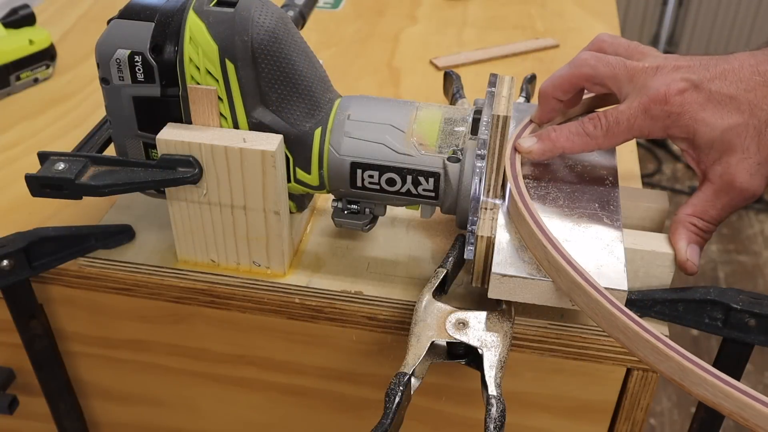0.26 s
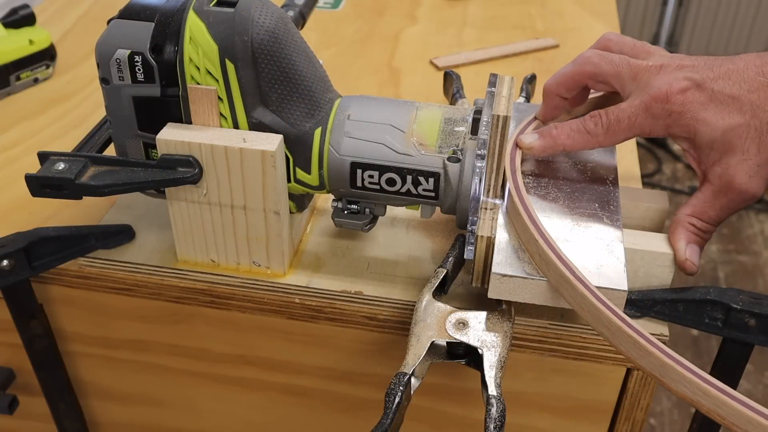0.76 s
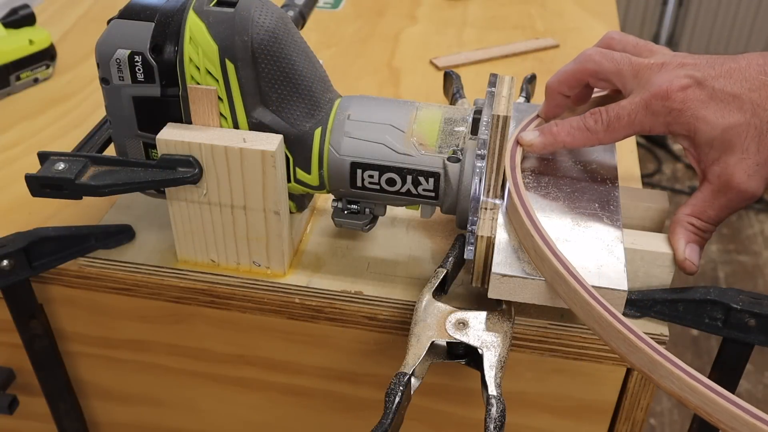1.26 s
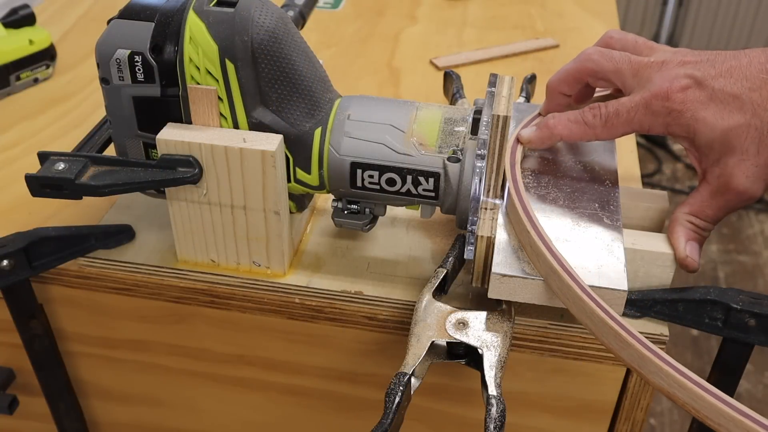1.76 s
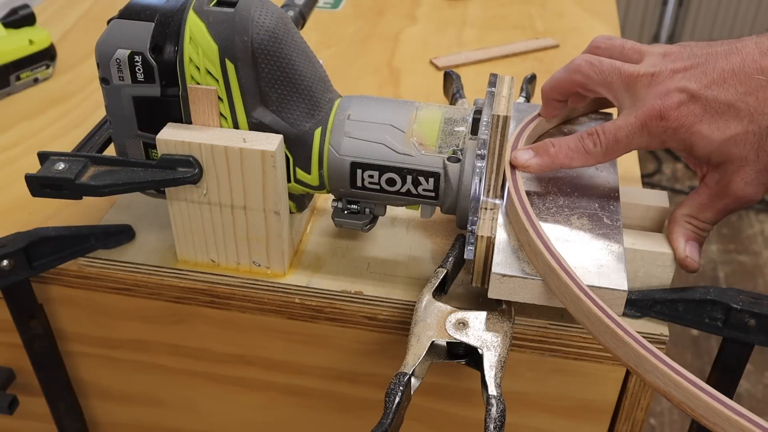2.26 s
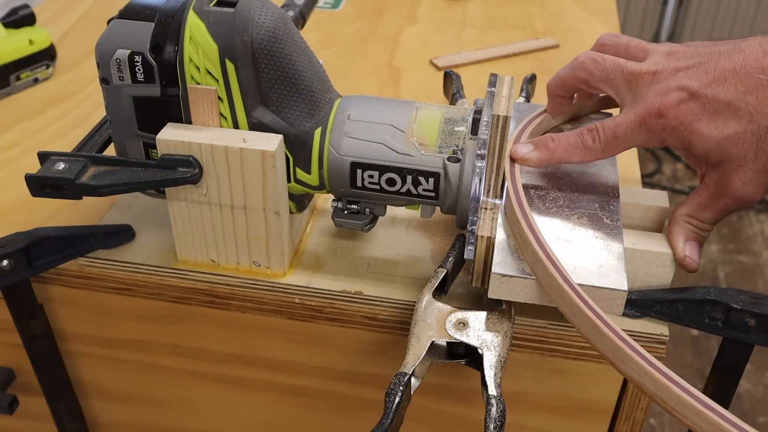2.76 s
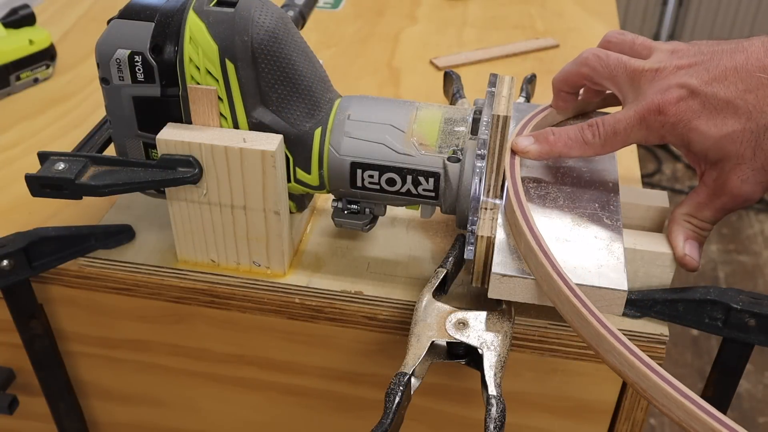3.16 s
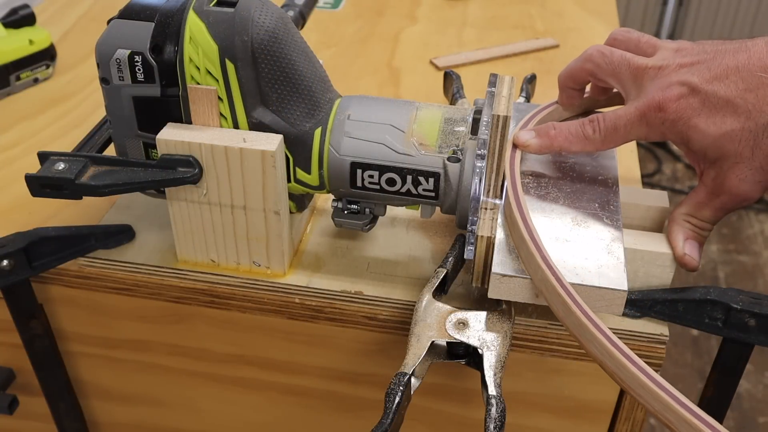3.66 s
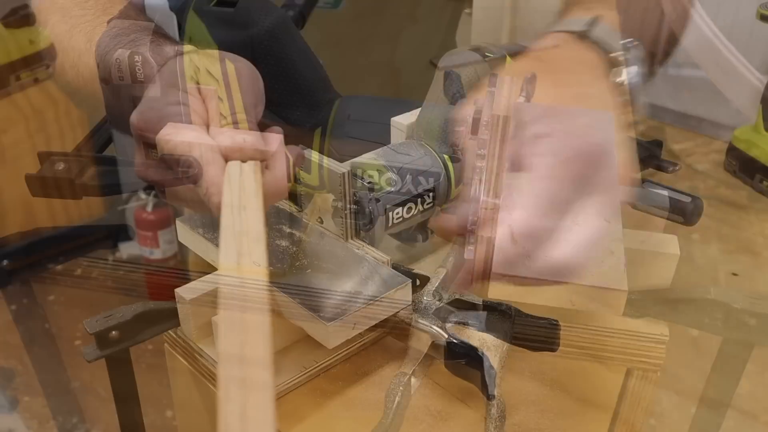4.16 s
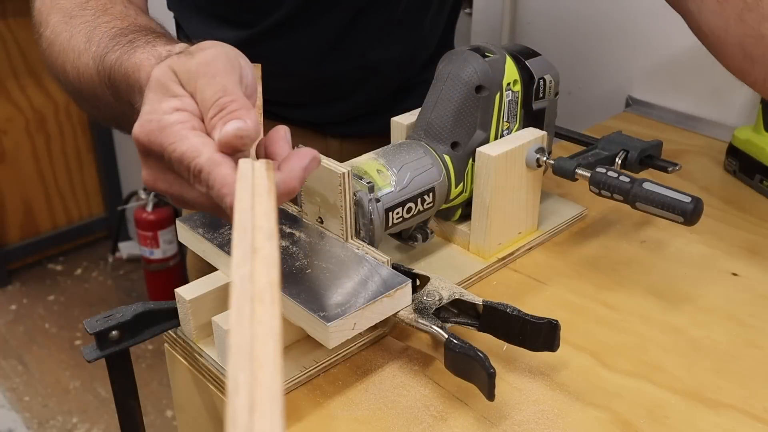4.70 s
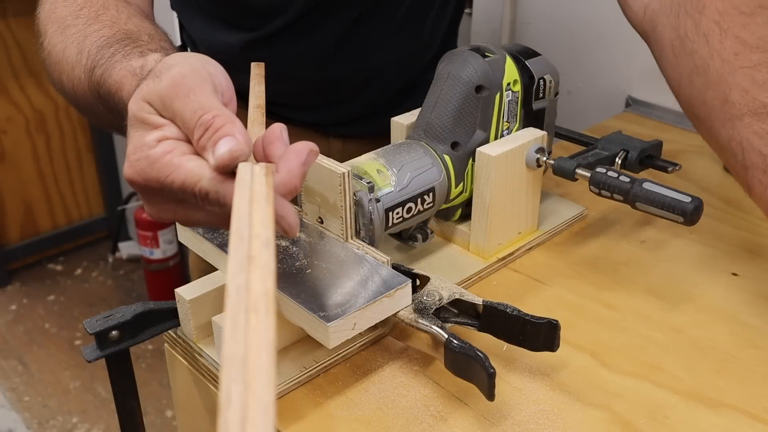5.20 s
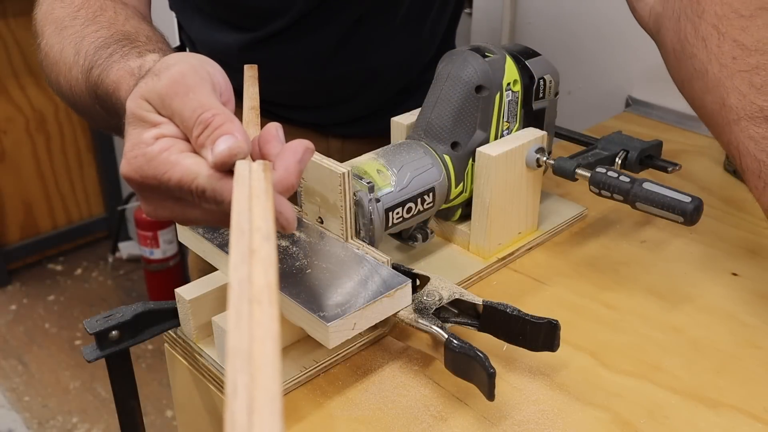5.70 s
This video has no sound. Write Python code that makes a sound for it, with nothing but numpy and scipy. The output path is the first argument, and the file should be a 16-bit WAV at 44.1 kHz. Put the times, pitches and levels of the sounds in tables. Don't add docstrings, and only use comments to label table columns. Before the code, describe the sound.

From 0 s a small trim router is already at full speed, heard close and dry. A strong, steady hum around 430 Hz dominates, with a high singing fan whine near 5 kHz, fine brushy overtones and a wide airy hiss. Hand pressure on the wooden strip makes the hum swell and ease slightly. Around 1.7-2.2 s the load lightens and pitch rises a hair; at about 2.3 s there is a short, rough grab and surge, then the motor settles lower. From 2.5 to 3.5 s the whine flutters with tiny judders, with another brief grab at 3.0 s. Near 3.9 s the strip flicks off, the pitch lifts, and the router fades out by 4.4 s. A much quieter workshop remains: soft ventilation and faint mains hum. A barely audible brush comes at 4.6 s, a small dry wood scuff at 5.45 s, then a lighter one at 5.6 s with a very faint, thin, high squeak until 5.87 s.

```python
import sys
import numpy as np
from scipy import signal
from scipy.fft import rfft, irfft, next_fast_len
from scipy.io import wavfile
from scipy.ndimage import uniform_filter1d

SR = 44100
rng = np.random.default_rng(int(sys.argv[2]) if len(sys.argv) > 2 else 0)


def generate_wav(signal):
    frames = np.transpose(np.atleast_2d(signal))
    scaled = np.clip(frames, -1, 1) * 32767
    pcm = np.round(scaled).astype(np.int16)
    wavfile.write(sys.argv[1], SR, pcm)


def undo_db(level):
    steps = np.asarray(level, float) / 20
    return 10 ** steps


N = 261947
TIME_S = np.arange(N) / SR
BLADES = 12


def level(x, db):
    return x * undo_db(db) / np.sqrt(np.mean(x ** 2))


def curves(table):
    s, *columns = np.transpose(table)
    return [np.interp(TIME_S, s, c) for c in columns]


def bump(s, half_s):
    return np.exp(-0.5 * ((TIME_S - s) / half_s) ** 2)


def walk(rate_hz):
    hold = int(SR / rate_hz)
    steps = np.repeat(rng.standard_normal(N // hold + 1), hold)
    return 1.154 * uniform_filter1d(uniform_filter1d(steps, hold), hold)[:N]


def band(hz, width_hz):
    b, a = signal.iirpeak(hz, hz / width_hz, fs=SR)
    once = signal.lfilter(b, a, rng.standard_normal(N))
    return level(signal.lfilter(b, a, once), 0)


def hiss(colour, swell_db, flicker_db, rate_hz, gate=1):
    size = next_fast_len(N)
    hz = np.fft.rfftfreq(size, 1 / SR) + 1e-3
    f, db = np.transpose(colour)
    tint = undo_db(np.interp(np.log(hz), np.log(f), db, right=-60))
    shaped = rfft(gate * rng.standard_normal(N), size) * tint
    third = 3 * np.log2(hz / 20)
    swell, out = swell_db * walk(rate_hz), 0
    for k in range(30):
        share = np.clip(1 - np.abs(third - k), 0, 1)
        out = out + irfft(shaped * share, size)[:N] * undo_db(swell + flicker_db * walk(rate_hz))
    return level(out, 0)


def order(turn, count, db, rough, rate_hz):
    wander = 1 + rough * (walk(rate_hz) + 1j * walk(rate_hz))
    spin = np.exp(1j * (count * turn + rng.uniform(0, 2 * np.pi)))
    return np.sqrt(2) * undo_db(db) * np.real(wander * spin) / np.sqrt(1 + 2 * rough ** 2)


def router():
    shaft_hz, turn = shaft()
    press, free, grabs = feed()
    surge_db = 1.5 * bump(2.3, half_s=0.22)
    thinning_db = -0.56 * TIME_S
    chips_db = thinning_db + 1.1 * grabs + free + surge_db
    vent_db = -44.5 + 0.078 * press + chips_db
    puff = 1 + 0.15 * np.cos(turn)
    out = shaft_hum(turn, press, free, grabs) + blade_tone(turn, press, free)
    out += bar_tones(turn, press, free) + whine_and_vents(turn, shaft_hz, vent_db, press, free, grabs, puff)
    out += cage_rattle(turn, press, free) + air_hiss(press, chips_db, puff)
    fade_start_s, fade_end_s = 3.902, 4.39
    return out * np.clip((fade_end_s - TIME_S) / (fade_end_s - fade_start_s), 0, 1) ** 1.24


# (time [s], speed [turns/s])
SHAFT_SPEED = [(.05, 429.2), (.29, 431.4), (.55, 430.3), (.8, 430.1), (1.01, 432.1), (1.25, 431.3),
               (1.52, 429.3), (1.64, 430.4), (1.8, 434.1), (2.09, 435.2), (2.21, 434.9), (2.36, 431.4),
               (2.55, 429.1), (2.86, 429.5), (3.04, 426.2), (3.17, 428.0), (3.82, 429.6), (4.07, 436.1)]


def shaft():
    shaft_hz, = curves(SHAFT_SPEED)
    return shaft_hz, 2 * np.pi * np.cumsum(shaft_hz + 0.261 * walk(12)) / SR


# (time [s], pressure over light contact [dB])
PRESSURE = [(0, 6), (.23, 2), (.6, 5.5), (.65, 3), (.72, 6), (1.0, 2), (1.08, 3.5), (1.56, 5), (1.71, 0.5),
            (2.2, .6), (2.26, 2), (2.42, 5.5), (2.82, 4.5), (3.0, 5.5), (3.77, 3.5), (3.93, 1.5)]
# (time [s], half length [s], strength [dB])
GRAIN_GRABS = [
    (2.265, 0.019, -0.5),
    (2.395, 0.013, -11),
    (3.025, 0.016, -7.5),
]


def feed():
    leaves_s, leave_takes_s = 3.965, 0.038
    free = np.clip((TIME_S - leaves_s) / leave_takes_s + 0.5, 0, 1)
    press = curves(PRESSURE)[0] * (1 - free)
    grabs = sum(undo_db(db) * bump(s, half_s) for s, half_s, db in GRAIN_GRABS)
    return press, free, grabs


# (order, light contact [dB], slope [dB per dB pressure], change when free [dB], wander [dB])
LOW_ORDERS = [(1, -27.5, 1, -2.5, 0.52), (2, -43, 0.83, -11, 1), (3, -45.5, 0.54, -4.5, 2),
              (4, -54.5, -0.7, 3, 2.5), (5, -58.5, 0.14, -3, 3), (6, -60, 1.1, 4, 0.5),
              (7, -45, -0.46, 0.5, 0.5)]
GRAB_ORDERS_DB = [-29, -42, -36, -35, -39, -41.5, -43]
FLICK_ORDERS_DB = [-41, -38, -64, -39, -52, -58, -40]
# (order, time [s], half length [s], level [dB])
STRIP_SINGS = [(3, 1.07, 0.62, -47), (3, 3.54, .18, -45), (4, 0.41, 0.021, -48), (3, 2.5, 0.47, -40.5),
               (4, 1.12, 0.068, -45), (4, 1.37, 0.025, -48), (4, 1.78, .1, -53), (4, 3.16, .08, -56),
               (4, 3.85, 0.036, -42.5), (5, 0.19, 0.18, -46.5), (5, 0.61, 0.11, -48.5),
               (5, 0.81, 0.046, -42.5), (5, 1.27, 0.28, -49.5), (5, 2.8, 0.02, -49), (5, 3.82, .05, -47),
               (6, 0.63, 0.058, -51), (6, 0.88, 0.043, -44.5), (6, 1.26, 0.16, -40.5),
               (6, 1.52, 0.038, -50), (6, 2.43, 0.028, -44), (6, 2.6, 0.063, -42), (6, 2.8, 0.077, -46.5),
               (6, 3.77, 0.05, -46), (7, .39, 0.047, -51), (7, 1.3, 0.29, -47.5), (7, 2.72, 0.19, -44),
               (7, 3.1, 0.033, -43.5), (7, 3.29, 0.032, -40.5), (7, 3.45, 0.034, -41), (7, 3.66, .05, -44)]


def shaft_hum(turn, press, free, grabs):
    out, flick = 0, bump(3.93, half_s=0.012)
    for row, grab_db, flick_db in zip(LOW_ORDERS, GRAB_ORDERS_DB, FLICK_ORDERS_DB):
        k, db, slope, free_db, wander_db = row
        size = undo_db(db + slope * press + free_db * free + wander_db * walk(14))
        size = size + undo_db(grab_db) * grabs + undo_db(flick_db) * flick
        for sung, s, half_s, sing_db in STRIP_SINGS:
            if sung == k:
                size = size + undo_db(sing_db) * bump(s, half_s)
        out = out + size * order(turn, k, db=0, rough=0.02 if k == 1 else 0.17, rate_hz=40)
    return out


# (time [s], half length [s], depth [0-1])
STRIP_JUDDER = [(1.87, .07, .35), (2.46, .01, .35), (2.625, .028, .5), (2.745, .009, .8), (2.925, .025, .5),
                (2.957, .007, .6), (3.03, .007, .9), (3.055, .02, .4), (3.087, .003, .7), (3.175, .01, .75),
                (3.262, .008, .6), (3.335, .006, .6), (3.367, .006, .85), (3.447, .006, .75),
                (4.02, .03, .5)]


def blade_tone(turn, press, free):
    steady = 1 - sum(depth * bump(s, half_s) for s, half_s, depth in STRIP_JUDDER)
    db = -38 + 0.5 * press - 2.5 * free - 0.5 * TIME_S + 1.2 * walk(9)
    out = steady * order(turn, BLADES, db, rough=0.1, rate_hz=45)
    return out + order(turn, 2 * BLADES, db - 25.5 - 0.8 * press, rough=0.44, rate_hz=30)


def bar_tones(turn, press, free):
    db = -53.5 - 1.3 * press
    out = order(turn, 21, db - 6 * free + 1.2 * walk(8), rough=0.2, rate_hz=30)
    return out + order(turn, 14, db - 5 * free - 3.5, rough=0.26, rate_hz=30)


# (order, level over the whine [dB])
WHINE_ORDERS = [(8, 7), (9, 2.5), (10, 5.5), (11, 2), (13, 0), (15, 3.5)]
# (frequency [Hz], density [dB per Hz])
VENT_COLOUR = [(4500, -20.5), (5600, 1), (6300, -1.5), (6700, -2.5), (8200, 0), (9200, -3.5),
               (10200, -12.5), (11000, -12.5), (11600, -11.5), (13000, -13.5), (15000, -20.5), (15700, -20)]


def whine_and_vents(turn, shaft_hz, vent_db, press, free, grabs, puff):
    whine_db = vent_db - 14 + 0.92 * np.minimum(press, 3.5) - 0.87 * TIME_S
    whine_db = whine_db - 6 * free + 7 * grabs + 1.6 * walk(28)
    hz, colour_db = np.transpose(VENT_COLOUR)
    high = [(k, np.interp(k * shaft_hz.mean(), hz, colour_db)) for k in range(13, 34) if k not in (13, 15, 21, 24)]
    out = undo_db(vent_db + 1) * hiss(VENT_COLOUR, swell_db=0.8, flicker_db=1.3, rate_hz=60, gate=puff)
    for k, db in [*WHINE_ORDERS, *high]:
        out += order(turn, k, whine_db + db + 2.5 * walk(5), rough=0.45, rate_hz=40)
    return out


def cage_rattle(turn, press, free):
    cage = 2 * np.pi * np.cumsum(180 + 4.94 * walk(6)) / SR
    db = -62.5 - 1.7 * press - 6 * free + 2.7 * walk(9.8)
    out = order(cage, 1, 0.57 * db - 27, rough=0.6, rate_hz=30)
    return out + order(turn - cage, 1, db - 3, rough=0.41, rate_hz=18)


# (frequency [Hz], density [dB per Hz])
AIR_COLOUR = [(40, -37), (120, -43), (135, -12.5), (300, -7.5), (550, 4), (950, 9), (1400, 2), (2050, 5.5),
              (2350, 0.5), (2850, 6), (3150, 12), (3550, 10), (4000, 5), (5500, 2)]


def air_hiss(press, chips_db, puff):
    air_db = -34.5 - 0.11 * press + chips_db
    return undo_db(air_db) * hiss(AIR_COLOUR, swell_db=0.74, flicker_db=0.67, rate_hz=28, gate=puff)


# (time [s], half length [s], level [dB], centre [Hz], ring [Hz])
WOOD_SCUFFS = [
    (4.587, 0.027, -55.5, 7940, 3020),
    (5.457, 0.013, -44, 1500, 1040),
    (5.485, .028, -58, 2500, 1070),
    (5.635, .012, -62, 3500, 4500),
]
# (time [s], frequency [Hz], level [dB])
SQUEAK_GLIDE = [
    (5.6, 10512, -74),
    (5.628, 11106, -81),
    (5.636, 11204, -71),
    (5.816, 11705, -76),
    (5.84, 11717, -78),
    (5.86, 11144, -75),
]


def handling():
    out = 0
    for s, half_s, db, hz, ring_hz in WOOD_SCUFFS:
        slide = band(hz, min(2.5 * hz, 9000))
        ring_db = -4 - 2 * np.log2(ring_hz / 1000)
        ring = undo_db(ring_db) * band(ring_hz, ring_hz / 14)
        out = out + bump(s, half_s) * undo_db(db) * (slide + ring)
    hz, db = curves(SQUEAK_GLIDE)
    gate = np.interp(TIME_S, [5.59, 5.61, 5.84, 5.87], [0, 1, 1, 0])
    tone = np.sqrt(2) * np.sin(2 * np.pi * np.cumsum(hz) / SR)
    return out + gate * undo_db(db + 2.5 * walk(30)) * tone


# (frequency [Hz], level [dB])
MAINS_LINES = [(59.5, -61.5), (242, -64), (361, -63)]
# (time [s], level [dB])
FADE_IN = [
    (3.9, -39),
    (4.05, -12.5),
    (4.2, -7),
    (4.4, -6.5),
]
# (frequency [Hz], density [dB per Hz])
ROOM_COLOUR = [(20, -30), (35, -6), (60, -11), (100, -9.5), (190, -12.5), (250, -5), (420, -9), (520, -5),
               (970, -11), (1300, -14), (1800, -18), (2560, -23), (6000, -26.5), (15600, -29)]


def workshop():
    hum = 0
    for hz, db in MAINS_LINES:
        hum = hum + np.sqrt(2) * undo_db(db + 2.7 * walk(6.5)) * np.sin(2 * np.pi * hz * TIME_S)
    ventilation = undo_db(-45.5) * hiss(ROOM_COLOUR, swell_db=-0.06, flicker_db=-0.4, rate_hz=12)
    return undo_db(curves(FADE_IN)[0]) * (ventilation + hum)


def scene():
    return (router() + handling() + workshop())[None]


def roll_off(x):
    return signal.sosfilt(signal.butter(12, 15710, fs=SR, output="sos"), x)


def record(dry):
    return roll_off(dry)


dry = scene()
out = record(dry)
generate_wav(out)
```